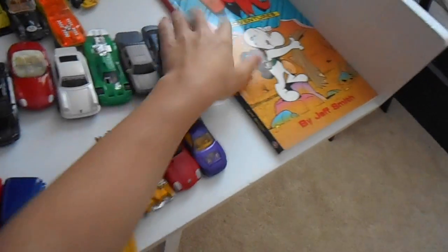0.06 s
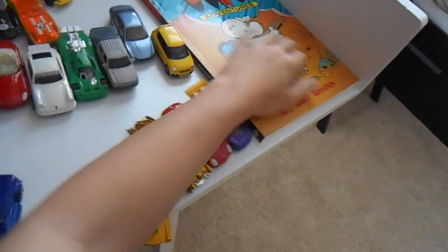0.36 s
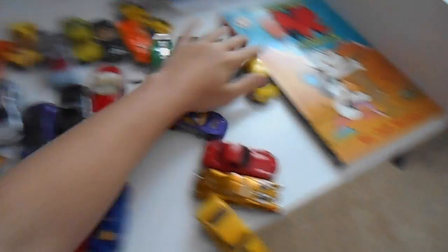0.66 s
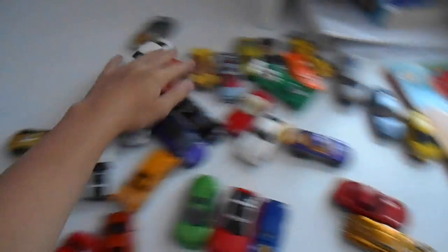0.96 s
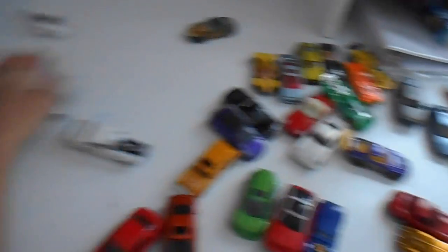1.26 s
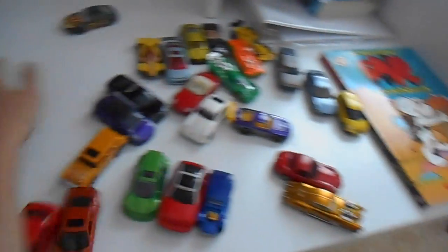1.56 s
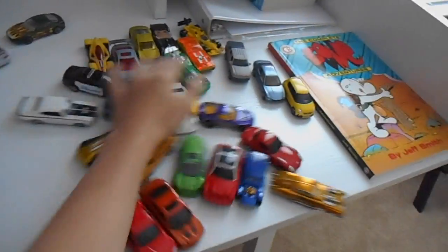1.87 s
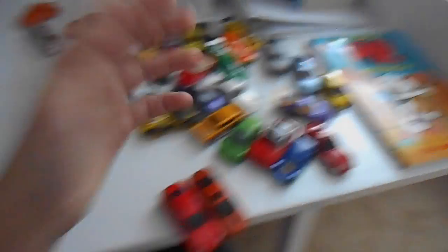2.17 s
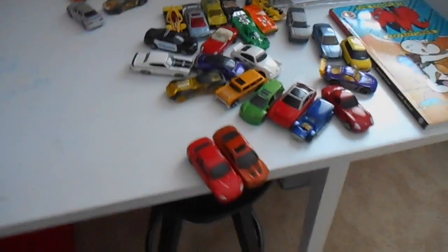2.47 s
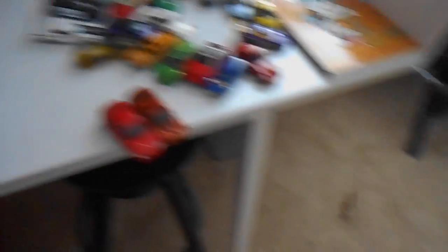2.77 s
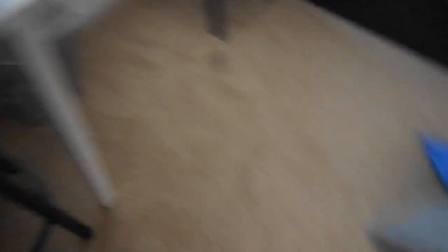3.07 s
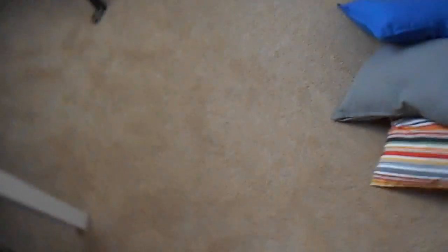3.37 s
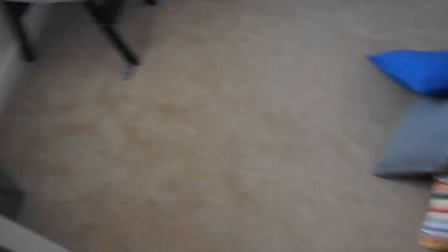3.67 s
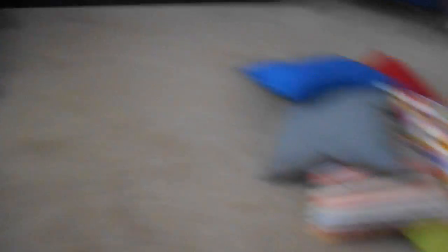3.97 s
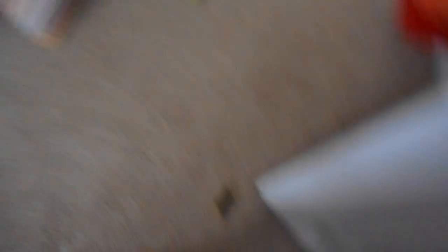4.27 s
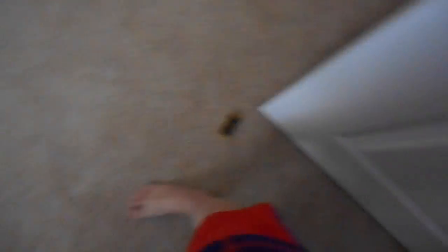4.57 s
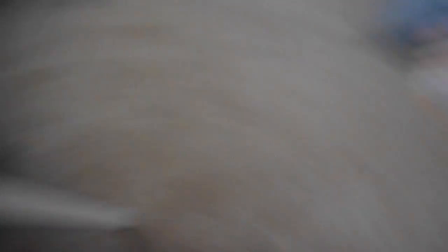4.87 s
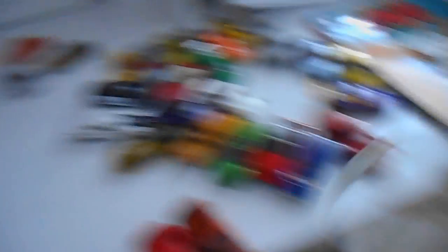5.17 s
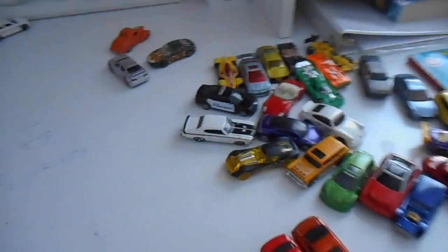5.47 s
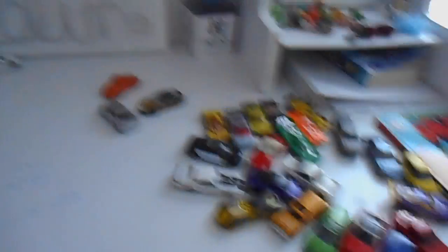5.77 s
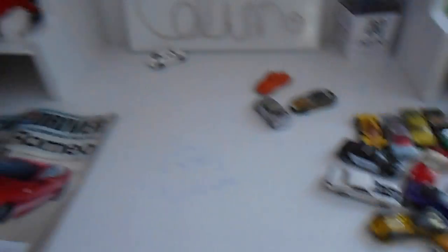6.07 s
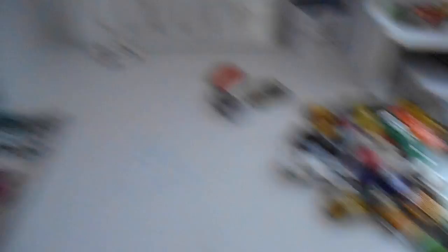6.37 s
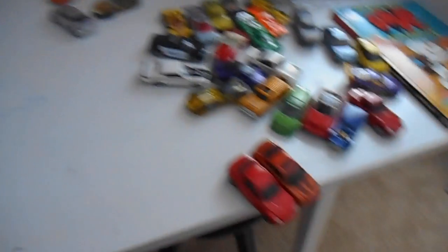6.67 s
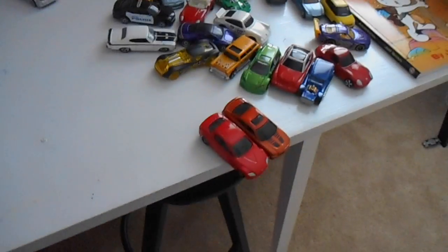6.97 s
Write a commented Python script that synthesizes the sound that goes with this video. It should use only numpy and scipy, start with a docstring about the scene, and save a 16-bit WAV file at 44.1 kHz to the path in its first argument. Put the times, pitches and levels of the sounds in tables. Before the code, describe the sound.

Toy cars rattle and clink as a hand sweeps them across a desk, then furniture bumps and a few dry clicks follow.

```python
"""Die-cast toy cars rattle and clack as a hand sweeps them together on a hard desk in a small carpeted room.
Wheels jiggle on wire axles, metal bodies snap and clink on contact, and the desk top drums under them.
The cars coast to rest; dull bumps on the furniture and one stray clack follow.
Small dry thuds, rubs and ticks come through the case of a hand-held camera, over low rumble and hush."""
import sys
import numpy as np
from scipy import signal
from scipy.fft import rfft, irfft, next_fast_len
from scipy.io import wavfile
from scipy.ndimage import uniform_filter1d, minimum_filter1d

SR = 44100
rng = np.random.default_rng(int(sys.argv[2]) if len(sys.argv) > 2 else 0)


def digitize_waveform(pressure):
    """Quantize a signal to 16-bit integers and store it at the path in sys.argv[1].

    Rows of a 2-D input are taken as channels; values are limited to [-1, 1].
    """
    field = np.atleast_2d(pressure).T
    bounded = np.clip(field, -1, 1)
    quanta = np.round(bounded * 32767).astype(np.int16)
    wavfile.write(sys.argv[1], SR, quanta)


N = 309443
TIME_S = np.arange(N) / SR
SHORT_S, LONG_S = TIME_S[:4096], TIME_S[:SR // 3]  # time axes of one hit

# hand pushes: start/s, rise/s, hold/s, effort/dB
PUSHES = [(0.0, 0.0091, 0.37, -17.5), (0.446, 0.019, 0.021, -13.5), (0.52, 0.022, 0.08, -21),
          (0.631, 0.034, 0.013, -14.5), (0.815, 0.13, 0.026, 5.5), (1.079, 0.0098, 0.0047, 2.5),
          (1.184, 0.26, 0.14, 1.5), (1.645, 0.21, 0.18, 3), (2.257, 0.028, 0.064, -14.5),
          (2.45, 0.15, 0.083, -31.5)]
# wheels and knuckles on the desk: t/s, level/dB, peak f/Hz, t60/s
KNOCKS = [(0.024, -27.5, 560, 0.066), (0.118, -31.5, 480, 0.025), (0.183, -30.5, 567, 0.057),
          (0.2879, -26.5, 1210, 0.023), (0.293, -31, 475, 0.04), (0.328, -24.5, 406, 0.07),
          (0.853, -11.5, 1010, 0.059), (1.474, -22, 450, 0.047), (1.548, -22, 696, 0.035),
          (1.596, -24, 302, 0.056), (1.964, -30.5, 396, 0.049), (2.018, -17, 630, 0.023),
          (2.277, -19, 730, 0.023), (2.293, -24.5, 560, 0.052), (3.422, -40, 1200, 0.02),
          (3.444, -43.5, 900, 0.03)]
# loudest car collisions: t/s, level/dB, peak f/Hz, chatter t60/s
CLACKS = [(0.0432, -28.5, 4500, 0.025), (0.052, -26.5, 3700, 0.068), (0.064, -31, 5500, 0.066),
          (0.1165, -24, 3900, 0.031), (0.181, -26.5, 4100, 0.03), (0.2189, -30, 3570, 0.05),
          (0.326, -11.5, 7200, 0.011), (0.3275, -11.5, 4370, 0.015), (0.339, -19, 4470, 0.0088),
          (0.6845, -34.5, 3980, 0.02), (0.743, -34.5, 5360, 0.0083), (0.76, -33.5, 5300, 0.03),
          (0.815, -17, 4880, 0.0077), (0.827, -30.5, 4580, 0.069), (0.8528, -15, 2920, 0.045),
          (0.9088, -17.5, 7140, 0.041), (0.923, -21, 3880, 0.097), (0.9399, -12.5, 4100, 0.025),
          (0.945, -8.5, 4500, 0.032), (0.959, -6, 6600, 0.022), (0.9667, -15.5, 4500, 0.061),
          (1.015, -13.5, 3580, 0.03), (1.023, -17, 6100, 0.024), (1.081, -24, 6000, 0.0096),
          (1.088, -18, 7100, 0.031), (1.1395, -20, 5370, 0.027), (1.219, -27.5, 4030, 0.062),
          (1.2752, -16.5, 3000, 0.03), (1.354, -19, 4050, 0.031), (1.3936, -21.5, 3400, 0.018),
          (1.4035, -16, 4100, 0.023), (1.595, -41, 5160, 0.015), (1.7118, -20, 2800, 0.0046),
          (1.7992, -18.5, 2810, 0.0088), (1.825, -20, 2490, 0.056), (1.851, -16.5, 2920, 0.045),
          (1.925, -14, 6860, 0.05), (1.9289, -8.5, 6750, 0.016), (1.9555, -10, 7050, 0.037),
          (1.963, -7, 3160, 0.017), (1.9684, -7, 3040, 0.023), (1.979, -11.5, 3300, 0.015),
          (2.004, -21, 7000, 0.01), (2.0135, -12.5, 7200, 0.02), (2.022, -16.5, 7200, 0.0083),
          (2.0448, -18, 6900, 0.012), (2.056, -24.5, 6000, 0.012), (2.064, -21.5, 7900, 0.011),
          (2.0838, -18.5, 5740, 0.02), (2.113, -16, 5960, 0.024), (2.1178, -11.5, 4834, 0.021),
          (2.21, -24.5, 2720, 0.018), (2.2405, -34, 3300, 0.039), (2.2585, -30, 2700, 0.044),
          (2.3035, -35.5, 7360, .02), (2.327, -35.5, 4900, 0.022), (2.36, -38, 7420, .022),
          (2.372, -34, 2730, 0.036), (2.396, -36, 3200, 0.022), (2.4257, -44, 2340, .016),
          (2.4376, -35.5, 3320, 0.019), (2.46, -44, 5650, 0.073), (2.5238, -42.5, 3390, 0.016)]
# jolted metal parts: t/s, level/dB, f/Hz, t60/s
PINGS = [(0.136, -29.5, 2630, 0.041), (0.814, -17, 5300, 0.017), (2.241, -35, 1900, 0.083),
         (3.097, -51, 4870, 0.11)]
# furniture bumps: t/s, level/dB, low-pass f/Hz
BUMPS = [(2.7533, -13, 2110), (3.096, -25.5, 596), (3.372, -35, 686)]
# grip shifts: t/s, level/dB, f/Hz
THUDS = [(3.1, -45, 55), (5.23, -44, 25.9), (5.331, -45, 45)]
# hand and clothes rubs: centre t/s, length/s, level/dB, peak f/Hz
RUBS = [(3.316, 0.13, -58.5, 5950), (3.57, 0.074, -57, 5050), (3.875, 0.077, -49.5, 1700),
        (4.232, 0.085, -44, 5000), (4.228, 0.37, -52.5, 1400), (4.449, 0.33, -55.5, 2500),
        (4.596, 0.06, -57, 5500), (5.96, 0.2, -60.5, 7070), (6.241, 0.13, -55.5, 5560)]
# stray car strike: t/s, level/dB, rattle t60/s
STRAYS = [(3.371, -25.5, 0.26)]
# ticks on the case: t/s, level/dB, peak f/Hz, peak width/oct, relative ring level/dB
TICKS = [(3.695, -37, 7000, .8, -20), (3.793, -22.5, 5500, .7, -14), (3.914, -32, 4400, .7, -14),
         (4.2579, -19, 6000, .3, -9), (4.942, -35, 3500, .6, -18), (5.192, -16, 7500, .4, -26),
         (5.216, -35, 8700, .2, -28), (5.241, -40, 8500, .3, -28), (5.347, -37, 6700, .15, -14),
         (5.41, -30, 1500, 1.1, -20), (5.418, -38, 6900, .2, -24), (5.701, -35, 5200, .3, -24),
         (6.753, -24, 3700, .7, -14)]

# body modes: f/Hz, level/dB, t60/s
CAR_MODES = [(1730, -1.5, 0.07), (2660, -0.5, 0.15), (2920, 0, .15), (3175, 0, 0.1), (3300, -4, 0.04),
             (3390, -9, 0.061), (3630, -1, 0.19), (3705, 6.5, 0.086), (4420, 4.5, 0.16), (4500, 5.5, 0.11),
             (4250, -1.5, .09), (5840, -11, 0.13), (5650, -6, .08), (6200, -5, 0.0893), (6500, 0, .08),
             (7300, 4.5, 0.11), (6700, -2.5, 0.097), (7150, 9.5, .09), (7400, 5, 0.1), (9000, 2, 0.06)]
DESK_MODES = [(131.84, -3, 0.82), (192, -18, 0.27), (242, -5, 0.15), (300, 0.5, 0.069), (335, 6, 0.09),
              (416.4, 0, 0.25), (460.4, 0.5, 0.2), (524.5, -4, 0.18), (656.5, 4, 0.13), (1000, -3.5, 0.094)]
FURNITURE_MODES = [(133.2, -18, 0.3), (189, -9.5, 0.069), (253, -8, 0.062), (330, -13.5, 0.042),
                   (520, -21, 0.11), (606, -4, 0.017), (783, -41, 0.045), (920, -44, 0.039),
                   (1626, -7.5, 0.0099)]
CASE_MODES = [(1900, -24, 0.021), (3300, -3.5, 0.022), (4500, -4.5, 0.015), (7200, -3, 0.011),
              (8970, 5.5, 0.0048)]

# noise spectra: f/Hz, level/dB
RATTLE_SPECTRUM = [(100, -28), (400, -14), (800, -8.5), (1300, -4), (2200, -1), (3000, 1), (4200, -1.5),
                   (6300, -5.5), (8000, -11.5), (10000, -24)]
DESK_SPECTRUM = [(30, -20), (80, -22), (130, -9), (190, -3), (260, -2.5), (450, 1.5), (800, -9), (1500, -9),
                 (4000, -25.5)]
CONTACT_SPECTRUM = [(60, -31.5), (200, -23.5), (450, -2.5), (800, -22), (1400, -4.5), (2200, -4.5),
                    (3000, -3), (4500, -4), (7000, -1), (8800, -1), (10000, -17)]
HUSH_SPECTRUM = [(15, -25), (27, -8), (45, -13.5), (75, -6), (150, -22.5), (230, -19.5), (350, -9.5),
                 (600, -8), (950, -11), (1600, -9), (3000, -13.5), (6000, -17.5), (10000, -26.5)]
RUMBLE_SPECTRUM = [(15, 2), (28, 4.5), (50, -3), (95, -4), (160, 0.5), (260, -9), (800, -14.5), (4000, -55)]
SHUDDER_SPECTRUM = [(40, 5), (200, -9), (450, -0.5), (700, -8), (1050, -19), (1500, -18), (2200, -24),
                    (4000, -17)]
RUB_SPECTRUM = [(100, -15), (400, -3.5), (900, -1), (1800, -0.5), (3500, -0.5), (7000, 0), (10000, -10.5)]
STRAY_SPECTRUM = [(100, -18), (400, 1), (1000, -29), (2000, -14), (3000, -5), (3900, 1), (5500, 1),
                  (6700, 9), (7300, 1), (8900, 8.5), (10000, -14)]
CASE_SPECTRUM = [(100, -25), (600, -13), (1500, -4), (2300, 3), (3200, 6), (5000, -3), (7000, 2),
                 (10000, -9)]

# background, louder while the camera is carried: t/s, level/dB
HUSH_LEVELS = [(2.6, -60), (3.2, -60.5), (4.2, -57), (4.8, -58.5), (5.4, -57.5), (7, -60)]
# handling rumble, strongest while the free hand works: t/s, level/dB
RUMBLE_LEVELS = [(0, -61.5), (2.6, -57), (3.9, -59), (5.3, -57), (6.2, -59), (7, -61)]
# room decay: f/Hz, t60/s
ROOM_DECAY = [(100, .5), (260, .4), (700, .28), (2000, .3), (5000, .26), (10000, .19)]
# early echoes: delay/s, level/dB
ECHOES = [(.0058, -19), (0.0145, -24.5), (.031, -19.5)]


def amp(db):
    """Decibels to gain."""
    return 10 ** (np.asarray(db) / 20)


def unit_rms(x):
    """Scale to rms 1."""
    return x / np.sqrt(np.mean(x ** 2) + 1e-20)


def at_hz(points, hz):
    """Interpolate a table over log frequency."""
    knots_hz, values = np.transpose(points)
    return np.interp(np.log(hz + 1), np.log(knots_hz + 1), values)


def envelope(levels):
    """Gain along a dB curve."""
    return amp(np.interp(TIME_S, *np.transpose(levels)))


def wander(rate_hz, depth_db):
    """Randomly drifting gain."""
    knots = int(TIME_S[-1] * rate_hz) + 2
    return amp(depth_db * np.interp(TIME_S * rate_hz, np.arange(knots), rng.standard_normal(knots)))


def add(mix, start_s, sound):
    """Mix a sound in place."""
    part = mix[max(round(start_s * SR), 0):][:len(sound)]
    part += sound[:len(part)]


def noise(spectrum, size=len(SHORT_S), peak_hz=1000, peak_db=0, width_oct=1):
    """Shaped noise with an optional peak, rms 1."""
    length = next_fast_len(size, True)
    hz = np.fft.rfftfreq(length, 1 / SR)
    lift_db = peak_db * np.exp(-(np.log2((hz + 1) / peak_hz) / width_oct) ** 2)
    shaped = rfft(rng.standard_normal(length)) * amp(at_hz(spectrum, hz) + lift_db)
    return unit_rms(irfft(shaped, length)[:size])


def burst(carrier, t60_s, rise_s):
    """Dense, heavily damped modes as fast-decaying noise."""
    shape = amp(-60 * SHORT_S / max(t60_s, 0.003)) * (1 - np.exp(-SHORT_S / rise_s))
    return unit_rms(carrier * shape) * np.sqrt(np.mean(shape ** 2))


def rings(modes, t, count=1, spread_db=0, damping=1):
    """Damped modes, one row per blow; their shares vary with the body and the spot hit."""
    hz, db, t60_s = np.transpose(modes)
    gains = amp(db + spread_db * rng.standard_normal((count, len(hz)))) * (-1) ** np.arange(len(hz))
    gains *= np.linalg.norm(amp(db)) / np.linalg.norm(gains, axis=1, keepdims=True)
    decays = amp(-60 * np.outer(damping / t60_s, t))
    return gains @ (decays * np.sin(2 * np.pi * np.outer(hz, t)))


def resized(ring, log_shift):
    """Same ring from a smaller (shift > 0) or larger body."""
    return np.interp(SHORT_S * np.exp(log_shift), SHORT_S, ring)


def effort(coast_db_per_s=104, rest_s=2.85):
    """Drive on the cars: each push builds, holds, then coasts away."""
    t, power = TIME_S[:round(rest_s * SR)], 1e-9
    for start_s, rise_s, hold_s, db in PUSHES:
        ramp = np.clip((t - start_s) / rise_s, 0, 1)
        coast_s = np.maximum(t - start_s - rise_s - hold_s, 0)
        power = power + (ramp * amp(db - coast_db_per_s * coast_s)) ** 2
    return np.sqrt(power)


def rattle(drive, clicks_per_s=850, click_t60_s=0.013, ring_db=-8, turn_s=0.02, cars=8):
    """Wheels jiggle on wire axles and bodies jostle: tiny clicks, sparser as the cars slow."""
    size = len(drive)
    density = np.clip(drive ** 0.65, 0.1, 1)
    fires = rng.random(size) < density * clicks_per_s / SR
    strength_db = 3.4 * np.minimum(rng.exponential(1, size), 3)
    clicks = fires * amp(strength_db) / np.sqrt(density)
    energy = signal.lfilter([1], [1, -amp(-60 / (click_t60_s * SR)) ** 2], clicks ** 2)
    chatter = unit_rms(np.sqrt(energy) * noise(RATTLE_SPECTRUM, size))
    # cars of different sizes ring in turn
    active_car = rng.integers(0, cars, size)[(TIME_S[:size] / turn_s).astype(int)]
    ringing = np.zeros(size)
    for car, ring in enumerate(rings(CAR_MODES, SHORT_S, cars)):
        body = resized(ring, 0.13 * rng.uniform(-1, 1))
        ringing += signal.oaconvolve(chatter * (active_car == car), body)[:size]
    return unit_rms(chatter + amp(ring_db) * unit_rms(ringing))


def rolling(rattle_db=-31, drum_db=-43, ring_db=-45):
    """Rolling cars rattle and drum the desk top; the drumming grows more slowly with drive."""
    drive = effort()
    size = len(drive)
    desk = unit_rms(signal.oaconvolve(rng.standard_normal(size), rings(DESK_MODES, LONG_S)[0])[:size])
    rattling = amp(rattle_db) * rattle(drive)
    drumming = amp(drum_db) * noise(DESK_SPECTRUM, size) + amp(ring_db) * desk
    return np.pad(drive * rattling + drive ** 0.56 * drumming, (0, N - size))


def knocks(gain_db=-4, ring_db=-23):
    """Blows on the desk: a short knock plus the ring of the board."""
    out = np.zeros(N)
    boards = rings(DESK_MODES, LONG_S, len(KNOCKS), spread_db=-7.5)
    for (start_s, db, hz, t60_s), board in zip(KNOCKS, boards):
        knock = burst(noise(DESK_SPECTRUM, peak_hz=hz, peak_db=24), t60_s, rise_s=0.00074)
        add(out, start_s, amp(db + gain_db) * knock)
        add(out, start_s, amp(db + gain_db + ring_db) * board)
    return out


def touches(count=56, end_s=2.2, base_db=-30.5, spread_db=7, centre_hz=3000, t60_s=0.079):
    """Light random collisions, louder with drive; rows as in CLACKS."""
    times_s = (np.arange(count) + rng.random(count)) * end_s / count
    strength, colour = rng.uniform(-1, 1, (count, 2)).T
    drive_db = 20 * np.log10(effort()[(times_s * SR).astype(int)])
    levels_db = base_db + 0.73 * drive_db + spread_db * strength
    return list(zip(times_s, levels_db, centre_hz * 2 ** (0.7 * colour), [t60_s] * count))


def snaps(hz, gap_s=0.0019, step_db=-3):
    """Two cars meet at three corners within milliseconds, each snap weaker and of its own colour."""
    out, start_s = np.zeros(len(SHORT_S)), 0
    for corner in range(3):
        corner_hz = hz * 2 ** (0.25 * rng.uniform(-1.4, 1))
        contact = noise(CONTACT_SPECTRUM, peak_hz=corner_hz, peak_db=19, width_oct=0.24)
        add(out, start_s, amp(corner * step_db) * burst(contact, t60_s=0.013, rise_s=0.00008))
        start_s += gap_s * (0.5 + rng.random())
    return out


def clacks(clink_db=-23):
    """Car on car: hard snaps, loose plastic chatter and a clink of two bodies damping each other."""
    out = np.zeros(N)
    hits = CLACKS + touches()
    clinks = amp(clink_db) * rings(CAR_MODES, SHORT_S, 2 * len(hits), spread_db=4, damping=5)
    for (start_s, db, hz, t60_s), pair in zip(hits, clinks.reshape(len(hits), 2, -1)):
        contact = noise(CONTACT_SPECTRUM, peak_hz=hz, peak_db=9, width_oct=0.64)
        chatter = burst(contact, t60_s, rise_s=0.00027)
        bodies = sum(resized(clink, 0.14 * rng.uniform(-1, 1)) for clink in pair)
        bodies *= np.sqrt(t60_s / 0.028)  # longer chatter feeds them more
        add(out, start_s, amp(db) * (snaps(hz) + chatter + bodies))
    return out


def pings():
    """Loose metal parts ring on after a jolt, one thin note each."""
    out = np.zeros(N)
    for start_s, db, hz, t60_s in PINGS:
        add(out, start_s, rings([(hz, db, t60_s)], LONG_S)[0])
    return out


def hush():
    """Quiet background with a slowly drifting level."""
    return envelope(HUSH_LEVELS) * wander(rate_hz=5, depth_db=0.8) * noise(HUSH_SPECTRUM, N)


def rumble():
    """Lumpy handling noise through the camera case."""
    return envelope(RUMBLE_LEVELS) * wander(rate_hz=9, depth_db=2.5) * noise(RUMBLE_SPECTRUM, N)


def bumps(push_s=0.00015, push_db=9, ring_db=-2, shudder_db=-9, jingle_db=-25, highpass_hz=65):
    """A short push booms the furniture and loose things on it jingle; softer contact is duller."""
    out = np.zeros(N)
    push = amp(push_db) * (1 - LONG_S / push_s) * np.exp(-LONG_S / push_s)
    for start_s, db, lowpass_hz in BUMPS:
        blow = push + amp(ring_db) * rings(FURNITURE_MODES, LONG_S)[0]
        add(blow, 0, amp(shudder_db) * burst(noise(SHUDDER_SPECTRUM), t60_s=0.075, rise_s=0.0005))
        add(out, start_s, amp(db) * signal.lfilter(*signal.butter(2, lowpass_hz, fs=SR), blow))
        jingle = burst(noise(CONTACT_SPECTRUM), t60_s=0.061, rise_s=0.00042)
        add(out, start_s, amp(db + jingle_db) * jingle)
    return signal.sosfilt(signal.butter(2, highpass_hz, "high", fs=SR, output="sos"), out + 1e-12)


def thuds(t60_s=0.29, rise_s=0.01):
    """The grip on the camera shifts: one low mode with a soft onset."""
    out = np.zeros(N)
    for start_s, db, hz in THUDS:
        add(out, start_s, rings([(hz, db, t60_s)], LONG_S)[0] * (1 - np.exp(-LONG_S / rise_s)))
    return out


def rubs():
    """Hand and clothes brush the case: soft swells of friction noise."""
    out = np.zeros(N)
    for centre_s, length_s, db, hz in RUBS:
        size = int(length_s * SR)
        friction = noise(RUB_SPECTRUM, SR, peak_hz=hz, peak_db=5, width_oct=0.99)[:size]
        add(out, centre_s - length_s / 2, amp(db) * np.hanning(size) * friction)
    return out


def stray_clack(rattle_db=-14, ring_db=-17, ring_hz=6680, ring_t60_s=0.19):
    """A stray car strikes: bright crack, uneven rattle of loose axles, thin ring of the body."""
    out = np.zeros(N)
    for start_s, db, t60_s in STRAYS:
        shaking = wander(rate_hz=300, depth_db=3.5)[:len(LONG_S)] * amp(-60 * LONG_S / t60_s)
        add(out, start_s, amp(db) * burst(noise(STRAY_SPECTRUM), t60_s=0.031, rise_s=0.0001))
        add(out, start_s, amp(db + rattle_db) * shaking * noise(STRAY_SPECTRUM, len(LONG_S)))
        add(out, start_s, rings([(ring_hz, db + ring_db, ring_t60_s)], LONG_S)[0])
    return out


def ticks(click_db=-3.5):
    """Dry ticks on the hollow plastic case, which rings differently at each spot."""
    out = np.zeros(N)
    case_rings = rings(CASE_MODES, SHORT_S, len(TICKS), spread_db=3)
    for (start_s, db, hz, width_oct, ring_db), ring in zip(TICKS, case_rings):
        add(out, start_s, amp(db + ring_db) * resized(ring, 0.081 * rng.uniform(-1.07, 1)))
        contact = noise(CASE_SPECTRUM, peak_hz=hz, peak_db=14.5, width_oct=width_oct)
        add(out, start_s, amp(db + click_db) * burst(contact, t60_s=0.0077, rise_s=0.00009))
    return out


def room(x, tail_db=-8, onset_s=0.0042, crossfade_hz=1.5, send_end_s=3.6):
    """Desk hutch and wall echoes, then a tail; two responses crossfade as hand and camera move."""
    out, size = x.copy(), round(send_end_s * SR)
    for phase_rad in (0, np.pi / 2):
        hz, t, bins = signal.stft(rng.standard_normal(len(LONG_S)), SR, nperseg=256)
        decay = amp(-60 * t / at_hz(ROOM_DECAY, hz)[:, None])
        response = signal.istft(bins * decay, SR, nperseg=256)[1]
        response *= 1 - np.exp(-(TIME_S[:len(response)] / onset_s) ** 2)
        response *= amp(tail_db) / np.linalg.norm(response)
        for delay_s, db in ECHOES:
            scatter = rng.standard_normal(64) * np.hanning(64)  # clutter smears each echo
            add(response, delay_s, amp(db) * scatter / np.linalg.norm(scatter))
        share = np.cos(2 * np.pi * crossfade_hz * TIME_S[:size] + phase_rad)
        add(out, 0, signal.oaconvolve(x[:size] * share, response))
    return out


def scene(direct_share=0.2):
    """Mono mix; camera noises, hush and a share of the hard cracks bypass the room."""
    background = hush()
    cracks = clacks() + stray_clack()
    in_room = room((1 - direct_share) * cracks + rolling() + knocks() + bumps() + pings())
    camera = rumble() + ticks() + rubs() + thuds()
    return (in_room + direct_share * cracks + camera + background)[None]


def record(dry):
    """Fast limiter on the loudest cracks, then a low-pass."""
    ceiling, window_s, lowpass_hz = 0.6, 0.002, 10180
    span = round(window_s * SR)
    gain = minimum_filter1d(ceiling / np.maximum(abs(dry), ceiling), span)
    limited = dry * uniform_filter1d(gain, span)
    lowpass = signal.firwin(181, lowpass_hz, window=("kaiser", 7), fs=SR)
    return signal.oaconvolve(limited, lowpass[None], "same")


dry = scene()
out = record(dry)
digitize_waveform(out)
```